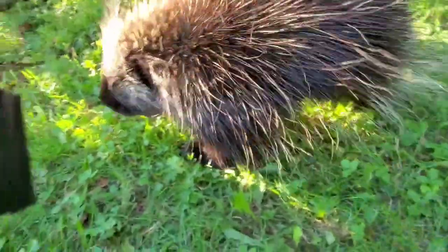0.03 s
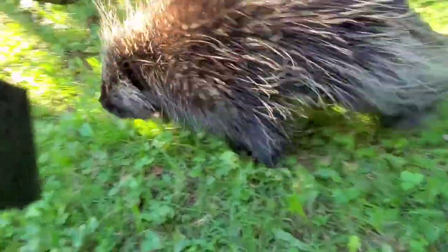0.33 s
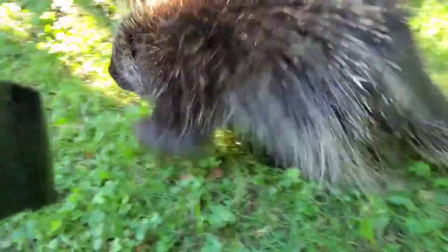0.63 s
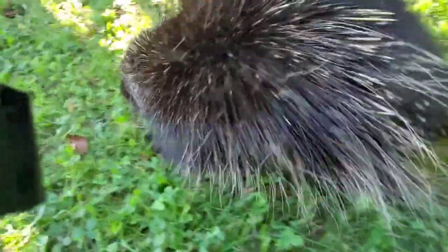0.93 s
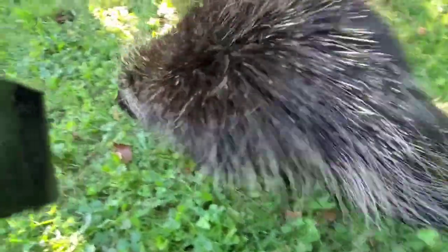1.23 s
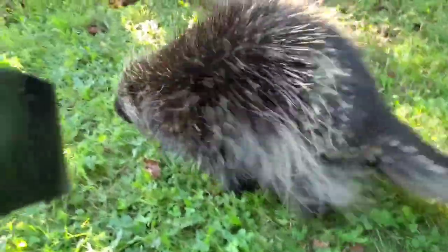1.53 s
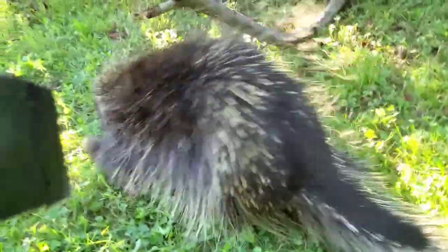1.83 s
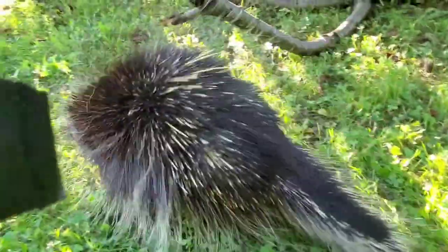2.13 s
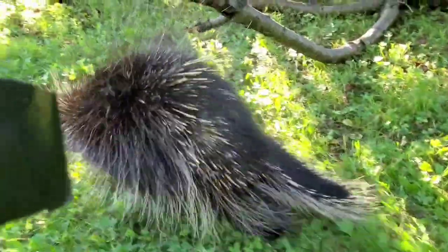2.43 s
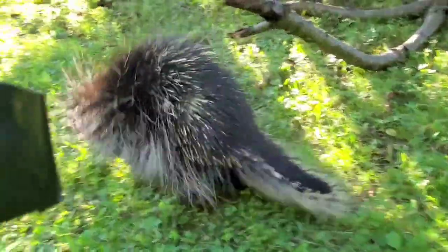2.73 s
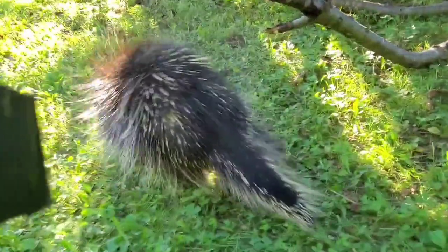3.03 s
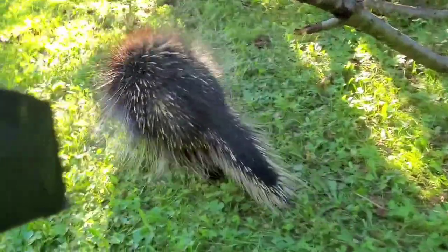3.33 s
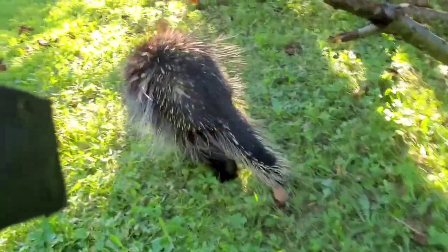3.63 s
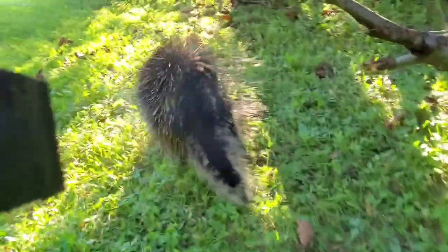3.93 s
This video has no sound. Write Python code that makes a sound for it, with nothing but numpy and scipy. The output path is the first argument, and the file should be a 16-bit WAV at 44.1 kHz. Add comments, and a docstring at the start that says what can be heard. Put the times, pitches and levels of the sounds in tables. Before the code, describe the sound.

Grass rustles close by as a porcupine walks, swelling with its steps throughout the four seconds. Small stems snap at the start, around 1.8 seconds and again near 2.7 seconds. Soft knocks tick about seven times a second. Behind lie a low rumble, a faint hum and a distant idling engine, with an airy hiss from the right and a thin insect-like buzz that fades by 2 seconds.

```python
"""Outdoors in short grass, a porcupine walks close by, swishing the blades and snapping a few stems.
The swish is fine noise and tiny clicks; each snap is a ringing crack with a woody body.
Behind it lie a low rumble, faint machine hum and a distant idling engine, one soft thud per firing.
An airy hiss comes from the right, with a thin insect-like buzz that fades out halfway.
Soft knocks tick along about seven times a second."""
import sys
import numpy as np
from scipy.fft import rfft, irfft, next_fast_len
from scipy.io import wavfile
from scipy.ndimage import map_coordinates

SR = 44100
rng = np.random.default_rng(int(sys.argv[2]) if len(sys.argv) > 2 else 0)


def bounce(signal):
    """Save signal as a 16-bit WAV file at the path given by the first command-line argument."""
    frames = np.transpose(np.atleast_2d(signal))
    limited = np.clip(frames, -1, 1)
    pcm = np.round(limited * 32767).astype(np.int16)
    wavfile.write(sys.argv[1], SR, pcm)


N = 176400
T = np.arange(N) / SR

# Levels in the tables are relative: each layer adds its own trim. Balance is left minus right.
# Tone of the far rumble. Each row: frequency in Hz, level in dB.
RUMBLE_EQ = [(12, -20), (25, -6), (50, 0.1), (75, 0.8), (130, -2), (180, -7), (260, -17), (350, -19),
             (500, -20), (800, -27), (1500, -45), (4000, -90)]
# How centred the rumble sits. Each row: frequency in Hz, left-right likeness from 0 to 1.
RUMBLE_LIKENESS = [(60, 0.86), (200, 0.63), (400, 0.53), (800, 0.21)]
# Machine tones. Each row: pitch in Hz, level at the crest in dB, time of the crest in seconds.
HUM_TONES = [(226, -66, 1.4), (257.6, -64, 2.6), (323, -69.5, 3.65), (387, -70, .9)]

# Idle speed. Each row: time in seconds, firings per second.
FIRING_RATE = [(0, 12.54), (1.7, 12.65), (2.5, 12.6), (4, 11.57)]
# The engine's early, light tone. Each row: multiple of the firing rate, level in dB.
LIGHT_HARMONICS = [(3, -12), (4, 4.5), (5, -3.5), (6, 0.5), (7, 1), (8, -1.5), (9, 0), (10, -2), (11, -9),
                   (12, -6.5), (13, -2.5), (14, -6), (15, -12), (16, -19), (18, -22.5), (19, -31)]
# Its later, boomy tone. Each row: multiple of the firing rate, level in dB.
BOOMY_HARMONICS = [(3, -20), (4, -7.5), (5, 7.5), (6, 3.5), (7, -27), (8, -6.5), (9, -17), (10, -4.5),
                   (11, -41), (12, -12), (13, -44), (14, -15.5), (15, -23), (16, -22), (18, -39), (19, -36)]
# Morph from light to boomy. Each row: time in seconds, boomy share from 0 to 1.
BOOM_SHARE = [(0, 0.094), (1.3, 0.033), (2.1, 0.8), (4, 0.8)]
# The engine's fader. Each row: time in seconds, level in dB.
ENGINE_LEVEL = [(0.0, -38), (1.2, -42.5), (2.45, -35.5), (3.8, -38), (3.83, -37.5), (4.0, -39)]

# Tone of the broad hiss. Each row: frequency in Hz, level in dB.
AIR_EQ = [(200, -32), (500, -17.5), (720, -3), (1020, 5.5), (1280, 6), (1600, 2.5), (2100, -5), (2450, -16),
          (2740, -12), (3050, -15), (3550, -16), (4100, -12.5), (5500, -19), (9000, -48), (15000, -28)]
# How focused the hiss is. Each row: frequency in Hz, left-right likeness from 0 to 1.
AIR_LIKENESS = [(500, 0.43), (1100, 0.68), (2000, 0.72), (2800, 0.6), (4000, 0.58), (7000, 0.18)]
# Where the hiss leans. Each row: frequency in Hz, balance in dB.
AIR_BALANCE = [(500, 6), (1200, 0), (2200, 0), (2450, 7.5), (2780, -4.5), (3400, -5), (4000, 5.5),
               (5500, -7), (9000, -7), (13000, 10)]
# The broad hiss's fader. Each row: time in seconds, level in dB.
AIR_LEVEL = [(0.0, -57), (0.07, -54.5), (0.37, -55.5), (0.51, -54), (2.24, -58), (2.72, -57), (3.98, -56.5),
             (4.0, -58)]
# A hollow band drifting in the hiss. Each row: time in seconds, centre in Hz, level in dB.
HOLLOW_PATH = [(0.0, 1880, -45), (0.32, 1760, -54), (0.76, 1760, -44), (0.89, 1840, -47.5),
               (1.78, 1830, -46.5), (2.08, 1740, -50.5), (2.19, 1970, -53.5), (2.26, 1690, -53.5),
               (2.43, 1810, -50), (3.13, 1867, -46.5), (3.42, 2050, -46), (3.66, 1900, -50.5),
               (4.0, 2030, -47)]
# The upper shoulder of that band. Each row: time in seconds, level in dB.
SHOULDER_LEVEL = [(0.0, -72), (0.14, -95), (1.86, -60), (2.14, -62), (3.35, -54), (3.65, -57), (4.0, -54)]
# Late arrival on the left of sound from the right. Each row: frequency in Hz, phase lag in radians.
LEFT_LAG = [(300, 0.077), (600, 0.57), (720, 0.79), (900, 2.83), (1400, 4.09), (1700, 5.22), (2000, 5.85),
            (2250, 7.94), (2600, 8.5), (3000, 10.36), (3500, 12.6), (4500, 16.63), (6000, 20.1)]
# The thin buzz. Each row: time in seconds, centre in Hz, level in dB.
BUZZ_PATH = [(0, 4510, -56.5), (.22, 4530, -65), (.33, 4390, -56), (.45, 4440, -57.5), (.65, 4470, -59),
             (.72, 4460, -51.5), (.81, 4480, -56), (.94, 4480, -67), (1.05, 4560, -60), (1.27, 4510, -62),
             (1.35, 4770, -62), (1.44, 4790, -53), (1.52, 4780, -64), (2.0, 4500, -76)]

# Soft knocks. Each row: start in seconds, level in dB.
KNOCK_CUES = [(0.078, -48), (0.234, -46.5), (0.366, -45.5), (0.504, -49), (0.646, -51), (0.788, -49),
              (0.922, -47), (1.055, -51), (1.205, -49), (1.356, -45.5), (1.488, -51), (1.605, -45.5),
              (1.733, -46), (1.879, -45.5), (2.045, -48.5), (2.196, -45.5), (2.346, -48.5), (2.497, -49),
              (2.646, -46.5), (2.801, -48.5), (2.982, -54), (3.13, -47.5), (3.268, -47), (3.678, -47),
              (3.842, -52)]
# Tone of a knock's bright tick. Each row: frequency in Hz, level in dB.
TICK_EQ = [(2000, -24), (5000, -16), (6500, -17), (7400, -12), (8600, -24), (10500, -23), (14000, -16)]

# Swells of brushed grass. Each row: time in seconds, level in dB.
SWISH_LEVEL = [(0.0, -62), (0.08, -54.5), (0.1, -58), (0.25, -59), (0.34, -52.5), (0.44, -52.5),
               (0.49, -59), (0.57, -49.5), (0.67, -50), (0.78, -58.5), (1.14, -59.5), (1.18, -51),
               (1.28, -59.5), (1.56, -52), (1.57, -57), (1.64, -51), (1.75, -48.5), (1.77, -44.5),
               (1.79, -47.5), (1.85, -52.5), (2.02, -57.5), (2.07, -64), (2.15, -67), (2.19, -55),
               (2.68, -58.5), (2.71, -47), (2.91, -53.5), (3.17, -62), (3.29, -69.5), (3.36, -51),
               (3.52, -52.5), (3.63, -50), (3.69, -60.5), (3.85, -54), (3.89, -66), (4.0, -49.5)]
# Tone of the swish. Each row: frequency in Hz, level in dB.
SWISH_EQ = [(800, -25), (2500, -5.5), (3600, -5), (5500, -10), (7600, 0), (9000, -3.5), (10500, 0.5),
            (12300, 5.5), (13400, 6), (15000, -2.5)]
# Where the swish leans. Each row: frequency in Hz, balance in dB.
SWISH_BALANCE = [(3000, 0.5), (5600, -8), (8000, -5.5), (9700, 5.5), (12200, -9.5), (14500, -2)]
# Snapping stems. Each row: start in seconds, level in dB, seconds to fall 60 dB, balance in dB,
# woody body against the crack in dB, ring pitch in Hz.
SNAP_CUES = [(0.0783, -31.5, 0.011, -2, -22, 7500), (.087, -44, .02, -1, -22, 8000),
             (.165, -43, .015, -2, -22, 11500), (.234, -48, .016, -4, -20, 10000),
             (.7874, -44, .018, -8, -22, 7800), (1.061, -42.5, 0.02, -5, -22, 7240),
             (1.21, -47, .025, 0, -20, 9250), (1.552, -38, .012, -8, -20, 13000),
             (1.759, -38, .035, 0, -7, 11500), (1.768, -30.5, .018, 1, -13, 11200),
             (1.769, -43, .04, -2, -16, 7300), (1.808, -38, .015, -3, -20, 11500),
             (2.7042, -30, 0.0096, -2, -4, 10800), (2.71, -49, .06, -6, -3, 7500),
             (2.729, -41, .04, 3, -8, 5500), (2.732, -30, 0.012, 2, -16, 12300),
             (2.738, -50, 0.13, -6, 0, 6960), (2.761, -47, 0.095, 0, -6, 7900),
             (2.822, -50.5, .1, -6, -4, 7560), (2.833, -45.5, 0.11, -3, -9, 5800),
             (3.12, -41, .01, -6, -11, 13200), (3.742, -49, 0.062, -1, -20, 12400)]
# Tone of a stem's crack. Each row: frequency in Hz, level in dB.
CRACK_EQ = [(1500, -35), (4000, -19), (5800, 0.5), (7400, 5), (9300, 0), (11500, 4.5), (14500, 7)]
# Tone of its woody body. Each row: frequency in Hz, level in dB.
WOOD_EQ = [(300, -7), (900, 2), (2500, 4.5), (3900, 1), (5500, 2.5), (9000, -40)]


def amp(db):
    """Decibels to gain."""
    return 10 ** (np.asarray(db) / 20)


def unit(x):
    """Scale to rms 1."""
    return x / np.sqrt(np.mean(x ** 2) + 1e-20)


def along(points, hz):
    """Read (Hz, value) points on a log frequency axis."""
    freqs, values = np.transpose(points)
    return np.interp(np.log(hz + 1), np.log(freqs + 1), values)


def curves(rows):
    """Automation lanes: one value per sample for each column after the time."""
    times, *columns = np.transpose(rows)
    return [np.interp(T, times, column) for column in columns]


def wobble(rate):
    """A smooth random curve with `rate` knots a second."""
    return map_coordinates(rng.standard_normal(256), [T * rate], mode="mirror")


def filtered(x, response):
    """Filter x by a gain given as a function of Hz."""
    size = next_fast_len(N + SR // 2)
    return irfft(rfft(x, size) * response(np.fft.rfftfreq(size, 1 / SR)), size)[..., :N]


def sides(db):
    """Left and right gains for a balance in dB; positive leans left."""
    return amp(np.array([[.5], [-.5]]) * db)


def shaped(x, eq, balance=((1, 0),)):
    """Stereo x with its tone and balance set by frequency, at rms 1."""
    return unit(filtered(x, lambda hz: amp(along(eq, hz)) * sides(along(balance, hz))))


def noise_pair(likeness):
    """Left and right white noise with a given likeness by frequency."""
    def mid_side_gains(hz):
        angle = np.arccos(np.clip(along(likeness, hz), -1, 1)) / 2
        return np.array([np.cos(angle), np.sin(angle)])
    mid, side = filtered(rng.standard_normal((2, N)), mid_side_gains)
    return np.array([mid + side, mid - side])


def from_right(x):
    """Place a sound on the right: it reaches the left side later."""
    return filtered(x, lambda hz: np.exp(np.array([[-.5], [.5]]) * 1j * along(LEFT_LAG, hz)))


def band(centre_hz, width_hz, likeness):
    """Stereo noise around a fixed or moving centre, 3.5 dB down at width_hz to either side."""
    skirt = lambda hz: 1 / (1 + (hz / width_hz) ** 2 / 2)
    a, b = (filtered(noise_pair([(1, likeness)]), skirt) for _ in range(2))
    phase = 2 * np.pi * np.cumsum(np.broadcast_to(centre_hz, N)) / SR
    return unit(a * np.cos(phase) + b * np.sin(phase))


def burst(start, t60, attack_s=0.00054):
    """An envelope with a sharp attack and a tail that falls 60 dB in t60 seconds."""
    t = np.maximum(T - start, 0)
    return (1 - np.exp(-t / attack_s)) * np.exp(-np.minimum(np.log(1000) * t / t60, 50))


def rumble(level_db=-45.5):
    """A bed of low outdoor noise, nearly the same on both sides."""
    return amp(level_db) * shaped(noise_pair(RUMBLE_LIKENESS), RUMBLE_EQ)


def machine_hum(swell_s=.7, depth_db=8):
    """Faint, wavering machine tones, each swelling once."""
    out = np.zeros(N)
    for hz, db, crest_s in HUM_TONES:
        swell = np.exp(-((T - crest_s) / swell_s) ** 2 / 2)
        rms = amp(db - depth_db * (1 - swell) + 2.7 * wobble(2.94))
        out += np.sqrt(2) * rms * np.sin(2 * np.pi * hz * T + wobble(9.1) / 2)
    return out


def engine(trim_db=-1, waver_db=2.6, waver_rad=.45, scatter_db=2.2):
    """One soft thud per firing: harmonics roughly in step, each wavering on its long way here."""
    rate, = curves(FIRING_RATE)
    boom, = curves(BOOM_SHARE)
    level_db, = curves(ENGINE_LEVEL)
    phase = 2 * np.pi * np.cumsum(rate) / SR
    thuds, power = np.zeros((2, N))
    for (multiple, light_db), (_, boomy_db) in zip(LIGHT_HARMONICS, BOOMY_HARMONICS):
        gain = amp(light_db + boom * (boomy_db - light_db) + waver_db * wobble(4))
        smear_rad = rng.standard_normal() * (1.5 - boom)  # the thuds tighten as they turn boomy
        thuds += gain * np.sin(multiple * phase + smear_rad + waver_rad * wobble(4))
        power += gain ** 2 / 2
    uneven_db = scatter_db * np.tanh(wobble(rate.mean()))  # no two thuds equally loud
    return amp(level_db + trim_db + uneven_db) * thuds / np.sqrt(power)


def hiss(air_trim_db=6.5, hollow_trim_db=-1, shoulder_trim_db=-4.5):
    """Broad air from the right, with a hollow band that drifts and swells, and a faint steady whine."""
    air_db, = curves(AIR_LEVEL)
    centre_hz, hollow_db = curves(HOLLOW_PATH)
    shoulder_db, = curves(SHOULDER_LEVEL)
    air = amp(air_db + air_trim_db) * shaped(noise_pair(AIR_LIKENESS), AIR_EQ, AIR_BALANCE)
    hollow_gain = amp(hollow_db + hollow_trim_db + 1.5 * wobble(25.29))
    hollow = hollow_gain * band(centre_hz + 25 * wobble(14), width_hz=247, likeness=0.88)
    shoulder = amp(shoulder_db + shoulder_trim_db) * band(1.2 * centre_hz, width_hz=66, likeness=0.23)
    whine = amp(-65.5) * band(centre_hz=2743, width_hz=44, likeness=0.53)
    return from_right(air + (hollow + shoulder) * sides(db=4.5) + whine * sides(db=-4))


def buzz(trim_db=-4.6, waver_hz=35):
    """A narrow, flickering, insect-like sizzle on the right, over a weaker, lower band."""
    centre_hz, level_db = curves(BUZZ_PATH)
    flicker = amp(2.2 * wobble(29.9))
    sizzle = flicker * band(centre_hz + waver_hz * wobble(22), width_hz=60, likeness=0.72)
    low = amp(-3.5) * band(centre_hz=3444, width_hz=520, likeness=0.43)
    return from_right(amp(level_db + trim_db) * (sizzle * sides(db=-9) + low))


def knocks(typical_hz=512, width_s=0.0015, rise_s=0.00295, blip_trim_db=3.5, tick_trim_db=-5.5):
    """Each knock is a dull blip of about two cycles with a faint bright tick."""
    tick_noise = shaped(rng.standard_normal((2, N)), TICK_EQ)
    out = np.zeros((2, N))
    for start, db in KNOCK_CUES:
        detune, brightness_db = rng.normal(0, [.1, 2])
        t = T - start - rise_s
        window = np.exp(-np.minimum((t / width_s) ** 2 / 2, 50))
        blip = window * np.sin(2 * np.pi * typical_hz * (1 + detune) * t)
        tick = burst(start, t60=0.031) * tick_noise
        out += amp(db + blip_trim_db) * blip + amp(db + tick_trim_db + brightness_db) * tick
    return out


def grass_swish(trim_db=3.5, grains_per_s=580, spread_db=9, grain_db=-6.5):
    """Fur and quills brush the blades: fine noise and tiny clicks that swell with each step."""
    level_db, = curves(SWISH_LEVEL)
    touches = rng.random((2, N)) < grains_per_s / SR
    polarity = rng.choice([-1, 1], (2, N))
    strength = amp(spread_db * np.minimum(rng.exponential(size=(2, N)), 2.3))  # cap the loudest clicks
    brush = rng.standard_normal((2, N)) + amp(grain_db) * unit(touches * polarity * strength)
    flutter_db = 1.76 * wobble(34.99)
    return amp(level_db + trim_db + flutter_db) * shaped(brush, SWISH_EQ, SWISH_BALANCE)


def stem_snaps(trim_db=3.5, ring_db=9, ring_octaves=.13):
    """Dry cracks underfoot: each stem rings at its own pitch, and thicker ones have more body."""
    white = rng.standard_normal((2, N))
    body = shaped(rng.standard_normal((2, N)), WOOD_EQ)
    out = np.zeros((2, N))
    for start, db, t60, balance_db, body_db, ring_hz in SNAP_CUES:
        boost_db = lambda hz: ring_db / (1 + (np.log2((hz + 1) / ring_hz) / ring_octaves) ** 2)
        crack = unit(filtered(white, lambda hz: amp(along(CRACK_EQ, hz) + boost_db(hz))))
        out += amp(db + trim_db) * burst(start, t60) * sides(balance_db) * (crack + amp(body_db) * body)
    return out


def scene():
    """The open-air mix, back to front, with no echo."""
    background = rumble() + (machine_hum() + engine()) * sides(db=1) + hiss() + buzz()
    return background + knocks() + grass_swish() + stem_snaps()


def record(dry, top_hz=14560):
    """A brick-wall low-pass takes off the very top."""
    return filtered(dry, lambda hz: hz < top_hz)


dry = scene()
out = record(dry)
bounce(out)
```